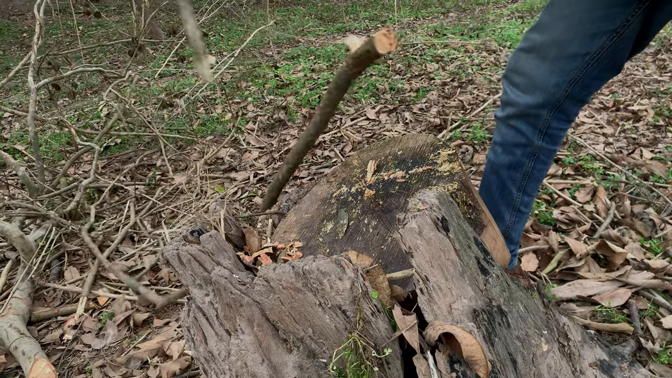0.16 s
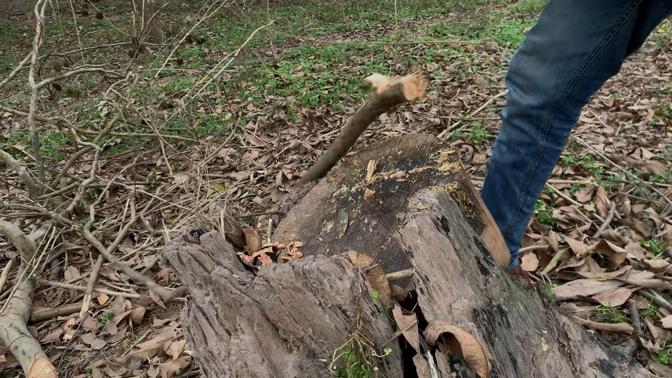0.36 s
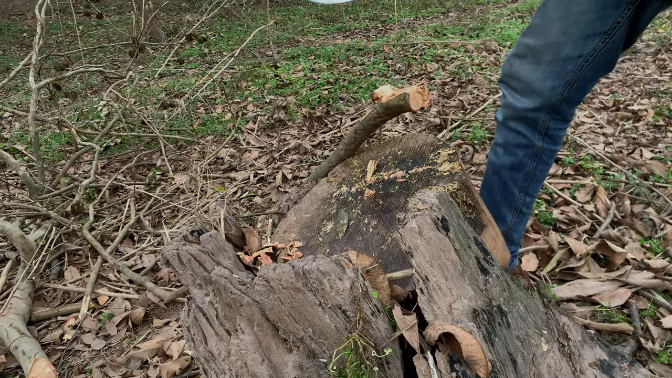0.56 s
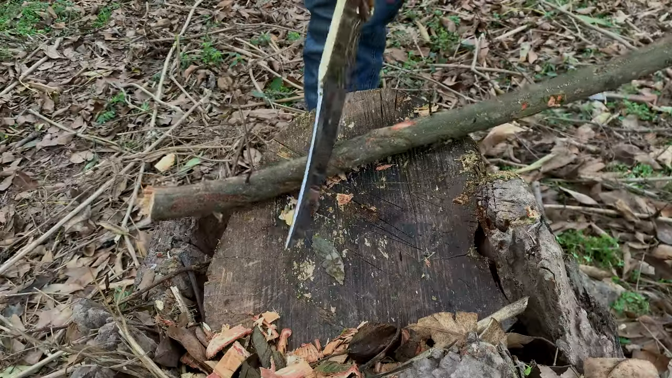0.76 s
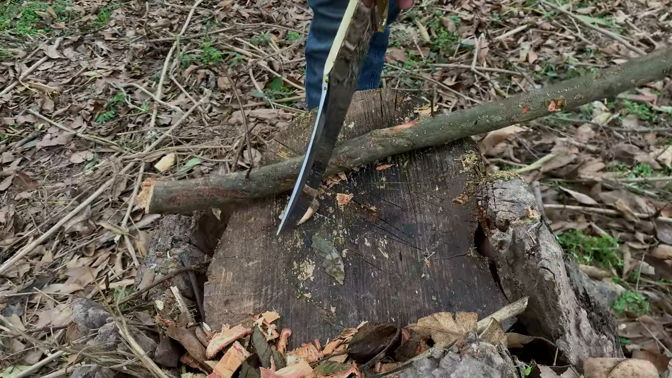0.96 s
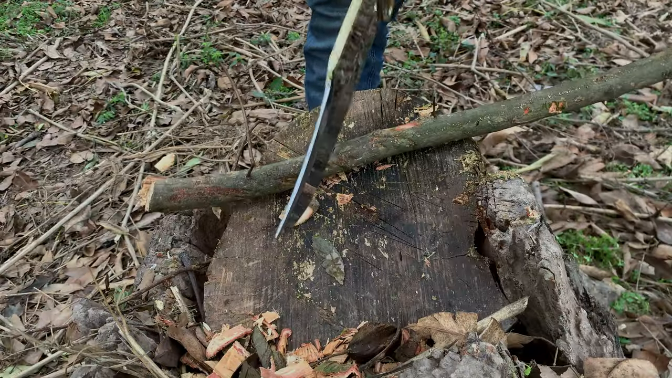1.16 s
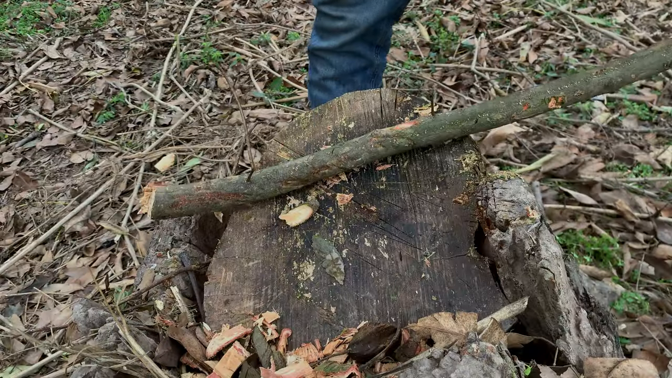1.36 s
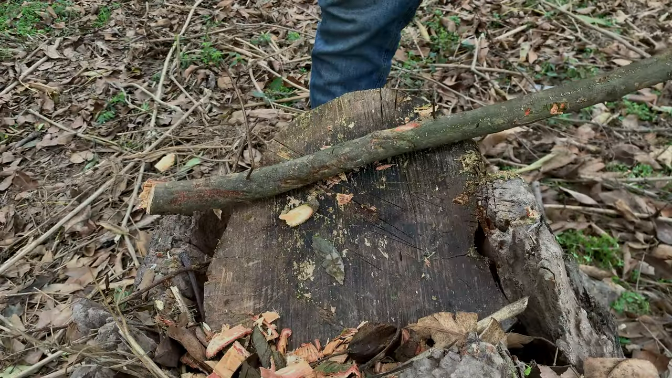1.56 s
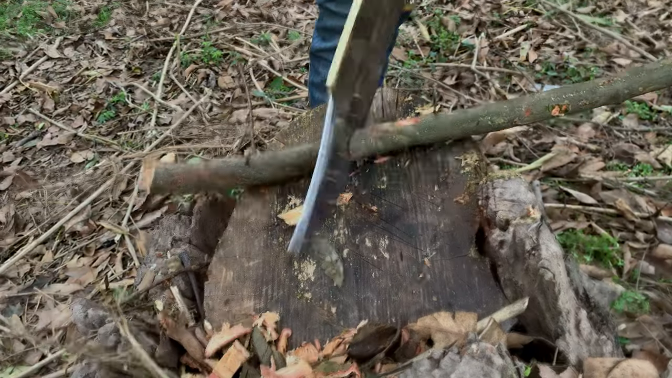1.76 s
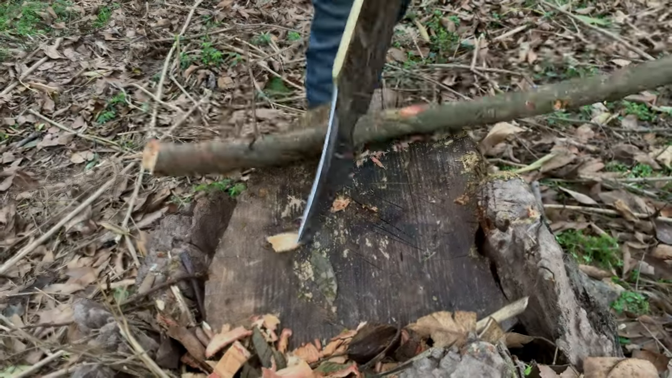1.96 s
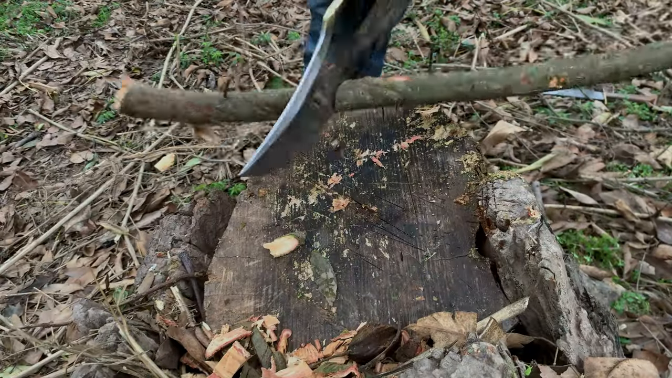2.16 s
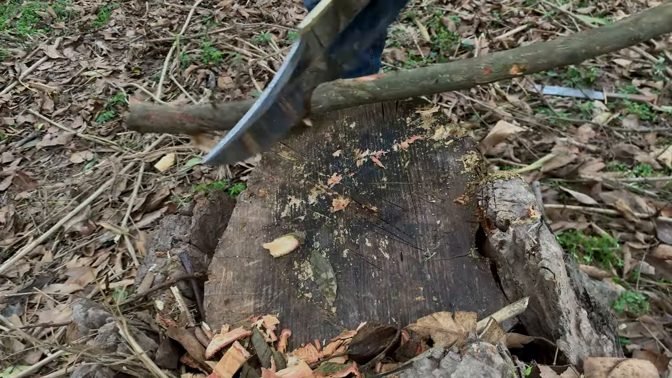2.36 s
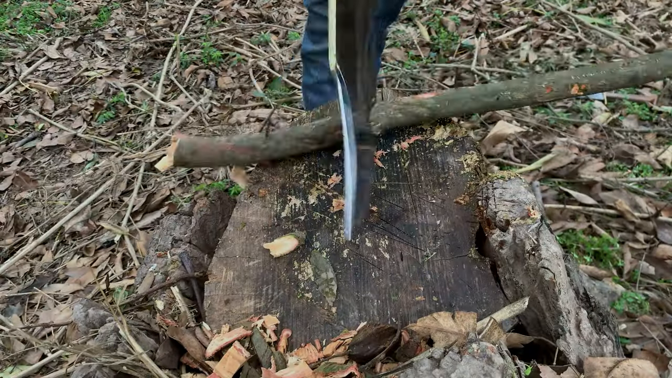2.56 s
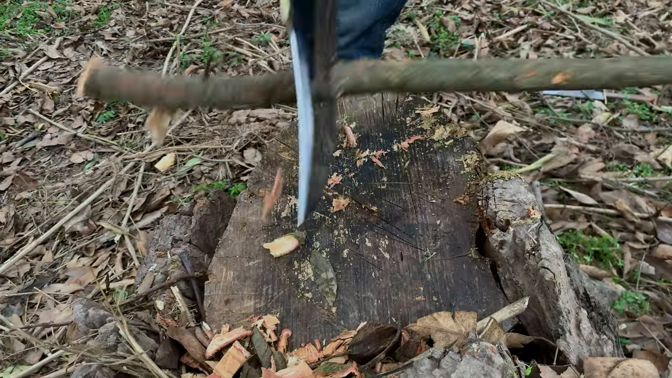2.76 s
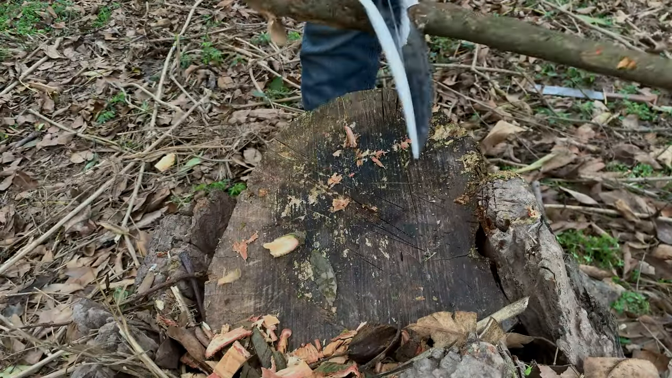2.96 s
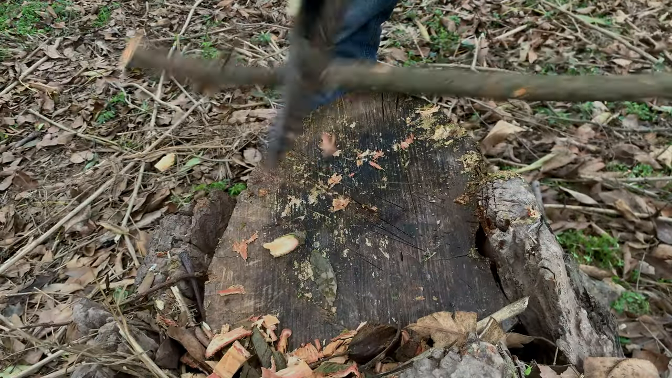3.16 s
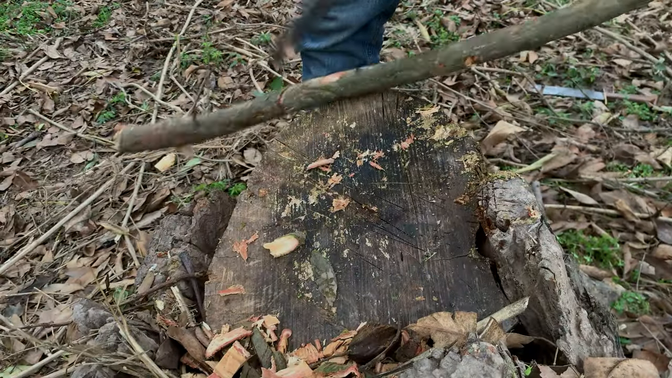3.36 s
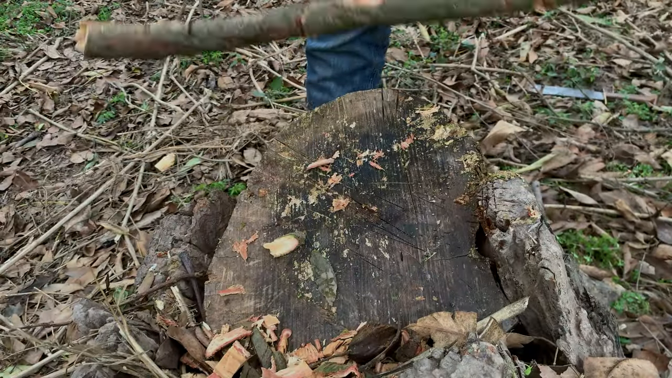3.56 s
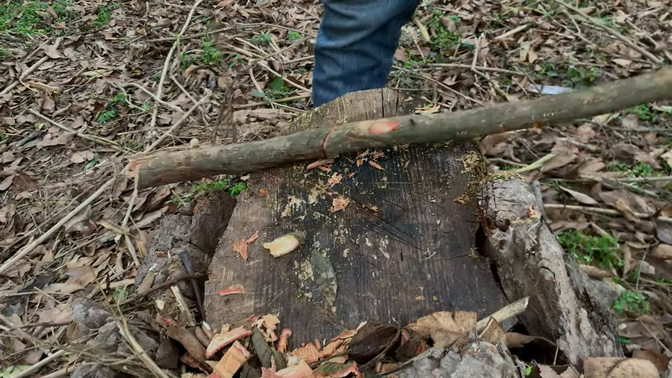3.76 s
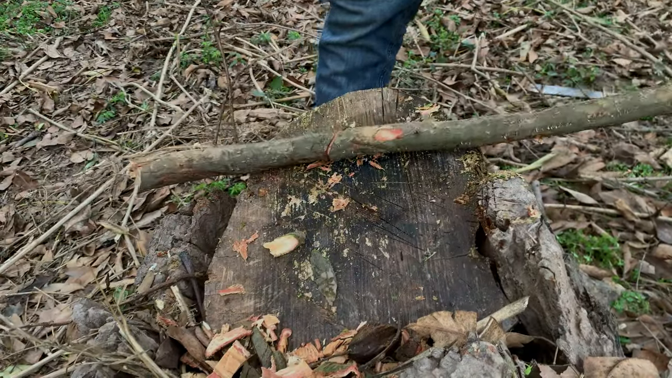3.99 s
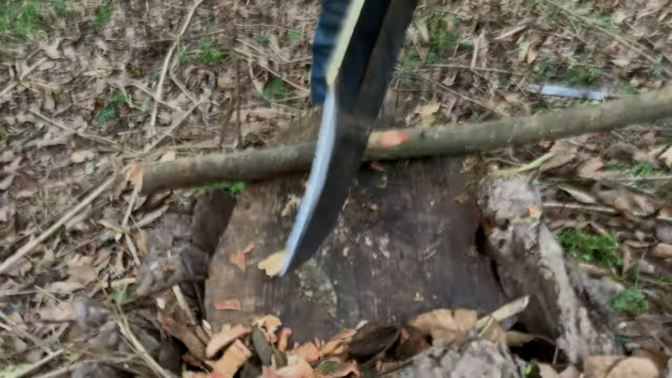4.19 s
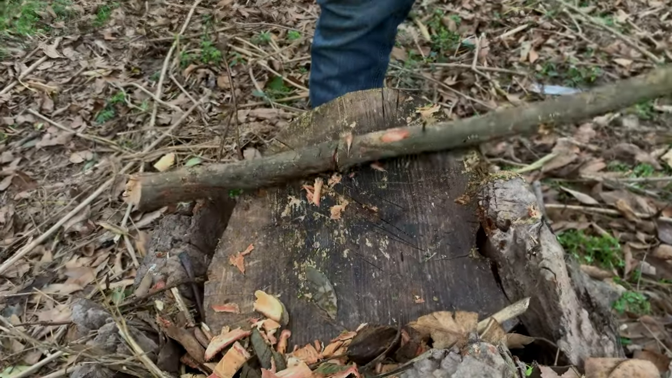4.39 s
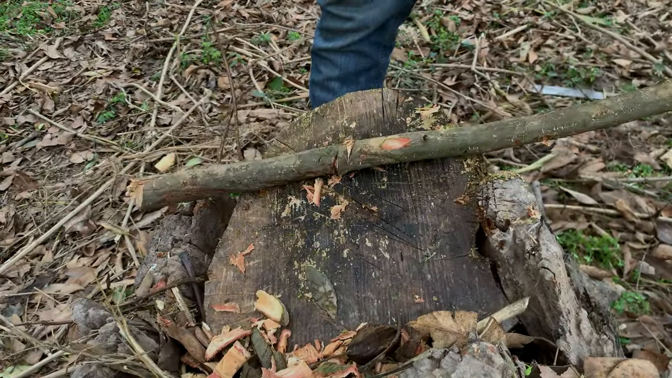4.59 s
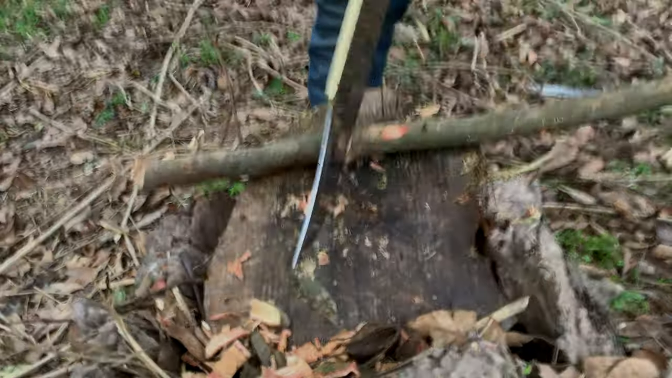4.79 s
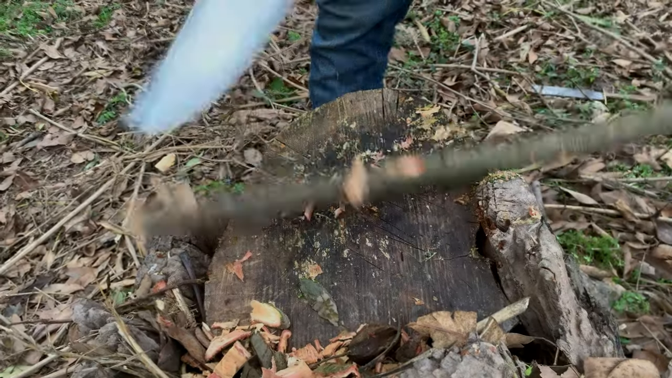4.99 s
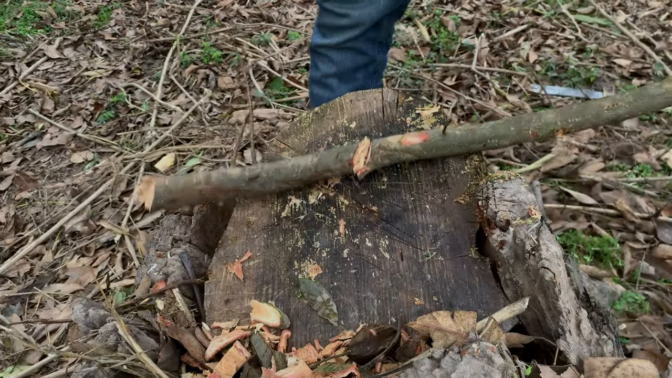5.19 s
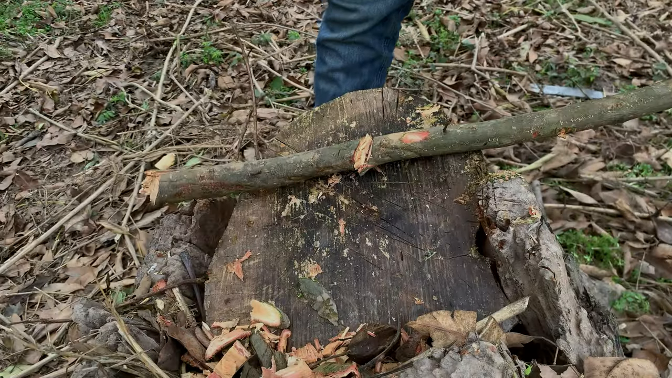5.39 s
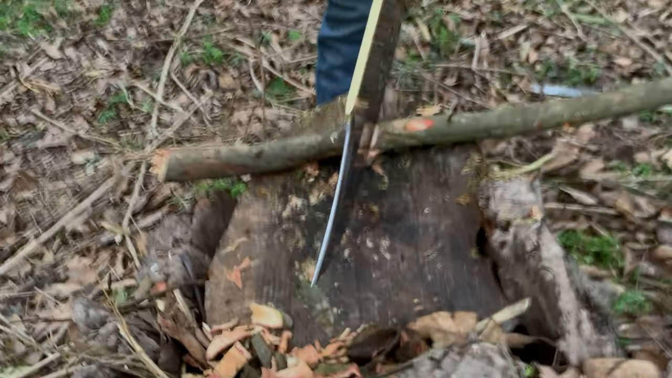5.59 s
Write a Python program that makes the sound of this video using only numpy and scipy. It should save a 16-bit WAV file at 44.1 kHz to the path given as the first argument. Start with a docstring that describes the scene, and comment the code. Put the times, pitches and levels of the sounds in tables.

```python
"""Knife chops on a tree stump

A large knife chops a green branch on a stump: four hard chops, with lighter knocks before and between.
A chop stacks noise bursts of breaking fibres, short decaying modes of wood and steel, and a falling thud.
Wobbling harmonics make one blade squeak; short noise bursts make the ticks of chips and twigs.
Shaped, clumpy noise and tiny pings make sleeves, leaves and bark rustle.
Behind lie far whistled birds, a low noise rumble, a faint drone and a scattered tail from the trees.
"""
import sys
import numpy as np
from scipy import signal
from scipy.fft import rfft, irfft, next_fast_len
from scipy.io import wavfile
from scipy.ndimage import map_coordinates

SR = 44100
rng = np.random.default_rng(int(sys.argv[2]) if len(sys.argv) > 2 else 0)


def inscribe(sig):
    """Save sig as 16-bit PCM at rate SR to the path in sys.argv[1].

    A 1-D sig is mono; a 2-D sig holds one channel per row.
    Samples are clipped to [-1, 1] before scaling.
    """
    pcm = np.round(np.clip(np.atleast_2d(sig).T, -1, 1) * 32767)
    wavfile.write(sys.argv[1], SR, pcm.astype(np.int16))


N = 248724
TIME = np.arange(N) / SR  # the whole scene [s]
SIZE = 16384  # samples in one short sound
T = np.arange(SIZE) / SR  # one short sound [s]
HZ = np.fft.rfftfreq(SIZE, 1 / SR)
LEAD = .01  # a short sound starts this long before its contact [s]


def amp(db):
    """Decibels to gain."""
    return 10 ** (np.asarray(db) / 20)


def unit(x):
    """Scale to rms 1."""
    return x / np.sqrt(np.mean(x ** 2) + 1e-20)


def burst(x):
    """Scale each channel to the energy of 10 ms at rms 1."""
    return x / np.sqrt(np.sum(x ** 2, axis=-1, keepdims=True) / (.01 * SR))


def along(points, hz):
    """Read a curve of (Hz, value) points on a log frequency axis."""
    f, v = np.transpose(points)
    return np.interp(np.log(hz + 1), np.log(f + 1), v)


def wobble(rate):
    """A smooth random curve with this many knots a second."""
    knots = rng.standard_normal(int(N * rate / SR) + 4)
    return map_coordinates(knots, [TIME * rate])


def filtered(x, response):
    """Filter x by a complex response of frequency."""
    n = x.shape[-1]
    padded = next_fast_len(n + 8192)
    spectrum = rfft(x, padded) * response(np.fft.rfftfreq(padded, 1 / SR))
    return irfft(spectrum, padded)[..., :n]


def coloured(x, spectrum):
    """Filter x by a curve of (Hz, dB) points."""
    return filtered(x, lambda hz: amp(along(spectrum, hz)))


def add(track, s, sound):
    """Mix in a short sound with its contact at s seconds; its far tail fades out."""
    start = max(round((s - LEAD) * SR), 0)
    fade = 1 - (T / T[-1]) ** 2
    track[..., start:start + SIZE] += (sound * fade)[..., :N - start]


def pair(width, size=N):
    """Stereo white noise: a common mid plus a share of side."""
    mid, side = rng.standard_normal((2, size))
    return np.array([mid + width * side, mid - width * side])


def fibres(spectrum, crest_s, rise_s, t60, grain_db, width):
    """Many small breaks or contacts: spiky stereo noise swells to a crest and dies."""
    t = T - LEAD - crest_s
    swell = np.exp(np.minimum(t, 0) / rise_s)
    decay = amp(-60 * np.maximum(t, 0) / t60)
    sizes = amp(grain_db * rng.standard_normal(SIZE))
    return burst(coloured(swell * decay * sizes * pair(width, size=SIZE), spectrum))


def ring(modes, late_s, rise_s, spread_db, detune):
    """Struck modes decay, with strengths and pitches that vary with the point of contact."""
    t = np.maximum(T - LEAD - late_s, 0)
    chance = rng.uniform(-1, 1, (len(modes), 3))
    tones = 0
    for (hz, db, t60), (size, shift, turn) in zip(modes, chance):
        level = amp(db + spread_db * size - 60 * t / t60)
        tones = tones + level * np.sin(2 * np.pi * (hz * (1 + detune * shift) * t + turn))
    return burst(tones * (1 - np.exp(-t / rise_s)))


# weight of the thud by frequency: (frequency [Hz], level [dB])
THUD_COLOUR = [(25, -24.5), (42, -13.5), (65, 8), (100, 4.5), (140, -4), (230, -4.5), (320, -19),
               (500, -33.5), (900, -53)]
# how late each part of the thud arrives: (frequency [Hz], delay [s])
THUD_DELAY = [(40, 0.06527), (70, .043), (100, 0.0164), (140, 0.0217), (200, 0.0157), (300, .006), (500, 0),
              (1200, 0.0022)]


def push(rebound_s, rebound_db):
    """A push on the stump and its opposite rebound; low notes come late, so the thud falls in pitch."""
    delay_phase = 2 * np.pi * np.cumsum(along(THUD_DELAY, HZ)) * SR / SIZE
    lead_phase = 2 * np.pi * HZ * LEAD
    contacts = 1 - amp(rebound_db) * np.exp(-2j * np.pi * HZ * rebound_s)
    return burst(irfft(amp(along(THUD_COLOUR, HZ)) * contacts * np.exp(-1j * (delay_phase + lead_phase))))


# hard chops: (time [s], thud [dB], knock [dB], clack [dB], ring [dB], ring pitch [ratio], crack [dB],
#   snap [dB], rebound delay [s], rebound beside the push [dB], rattle [dB])
CHOPS = [(1.7595, -4.5, -19, -19, -20, .83, -26.5, -27.5, .0095, -5, -57.5),
         (4.1, -3.5, -18.5, -25.5, -21, .99, -25.5, -22, .0102, 1, -44.5),
         (4.727, -3, -16.5, -21, -24.5, 1.16, -26.5, -20.5, 0.01039, -0.5, -53),
         (5.536, -5, -16, -29.5, -19, .99, -31.5, -28.5, .011, 1, -55)]
# the stump booms: (frequency [Hz], level [dB], t60 [s])
STUMP_BOOM = [(65.3, 1.5, 0.78), (119.4, -9, 0.41), (151.8, 4, .3), (185.5, -13, 0.37), (251, -7.5, 0.2)]
# the stump's top knocks: (frequency [Hz], level [dB], t60 [s])
STUMP_TOP = [(338, -5.5, 0.052), (374.8, -3, .055), (454, -1.5, .05), (536, 3.5, 0.024), (635, -8, 0.038),
             (817, -4.5, 0.033)]
# the branch rings: (frequency [Hz], level [dB], t60 [s])
BRANCH = [(1140, -17, 0.04), (1215, -9.5, .022), (1690, -2.5, 0.023), (2020, -21.5, 0.035),
          (2290, -15, 0.019), (2615, -15, 0.038)]
# steel, damped by the cut: (frequency [Hz], level [dB], t60 [s])
BLADE = [(3770, -1, 0.035), (4310, 1.5, 0.041), (4470, -6.5, 0.048), (5280, -5, 0.054), (5170, -6.5, 0.044),
         (6680, 1.5, 0.036), (6740, -3, 0.021)]
# hard wood on wood: (frequency [Hz], level [dB])
CLACK = [(300, -22), (550, -0.5), (820, 2), (1000, -5.5), (1300, -14), (1800, -19.5), (4000, -42.5)]
# wood parting: (frequency [Hz], level [dB])
SPLIT = [(500, -4), (1000, -8.5), (2000, -1.5), (3000, -12), (5000, -22)]
# cracking fibres and bark: (frequency [Hz], level [dB])
CRACK = [(1500, -37.5), (3000, -2.5), (4500, -8.5), (6800, -7.5), (9000, -18.5), (16000, -33.5)]
# the sharpest snap on top: (frequency [Hz], level [dB])
SNAP = [(4000, -27.5), (7500, -7.5), (9500, 0), (11000, -1.5), (13000, -8.5), (16000, -20)]


def chops():
    """The blade splits fibres and rings, drives the branch into the stump, and crumbs scatter."""
    out = np.zeros((2, N))
    for (s, thud_db, knock_db, clack_db, ring_db, pitch, crack_db,
         snap_db, rebound_s, rebound_db, rattle_db) in CHOPS:
        # the stump is pushed, booms and knocks
        thud = amp(thud_db) * push(rebound_s, rebound_db)
        hollow = amp(thud_db - 14.0) * ring(
            STUMP_BOOM, late_s=0.0249, rise_s=0.0039, spread_db=5.5, detune=.004)
        knock = amp(knock_db) * ring(
            STUMP_TOP, late_s=0.0013, rise_s=0.0011, spread_db=1.5, detune=0.055)
        clack = amp(clack_db) * fibres(
            CLACK, crest_s=0.0015, rise_s=0.00086, t60=0.019, grain_db=2.0, width=0.17)
        # the branch bounces, slaps the stump again and rattles
        slap = amp(knock_db - 14.5) * ring(
            STUMP_TOP[:3], late_s=.021, rise_s=0.0034, spread_db=2.0, detune=0.078)
        rattle = amp(rattle_db) * fibres(
            CLACK, crest_s=.059, rise_s=.001, t60=0.044, grain_db=4.5, width=0.28)
        # the branch rings higher or lower with the place where it is struck and held
        held_branch = [(hz * pitch, db, t60) for hz, db, t60 in BRANCH]
        wood = amp(ring_db) * ring(
            held_branch, late_s=0, rise_s=0.00072, spread_db=3.0, detune=0.018)
        steel = amp(crack_db - 7.0) * ring(
            BLADE, late_s=0, rise_s=.0008, spread_db=4.5, detune=0.0025)
        # the fibres give way
        split = amp(ring_db) * fibres(
            SPLIT, crest_s=0.0017, rise_s=0.002, t60=0.023, grain_db=4, width=0.37)
        crack = amp(crack_db) * fibres(
            CRACK, crest_s=0.0022, rise_s=.0018, t60=0.029, grain_db=6.5, width=.6)
        snap = amp(snap_db) * fibres(
            SNAP, crest_s=0.0013, rise_s=0.0012, t60=0.0076, grain_db=9.5, width=0.062)
        # debris follows, later and longer
        crumbs = amp(crack_db - 25) * fibres(
            CRACK, crest_s=0.022, rise_s=.008, t60=0.2, grain_db=11, width=0.65)
        dust = amp(snap_db - 31.5) * fibres(
            SNAP, crest_s=0.042, rise_s=.008, t60=0.46, grain_db=11, width=.3)
        stump = thud + hollow + knock + clack + slap + rattle
        add(out, s, stump + wood + steel + split + crack + snap + crumbs + dust)
    return out


# the branch drops or is set down on the stump:
#   (time [s], thud [dB], hollow [dB], knock [dB], ring [dB])
KNOCKS = [(.04, -29.5, -43.5, -45.5, -54), (.097, -32, -43, -48, -78), (.317, -35, -42, -55, -71),
          (.784, -29.5, -25.5, -49, -70), (1.904, -37.5, -39, -58.5, -63.5), (2.583, -28, -22.5, -37, -37),
          (3.071, -32, -35.5, -64.5, -73), (3.112, -32.5, -41.5, -48, -52), (3.197, -26, -37.5, -52.5, -75),
          (3.274, -28, -66, -46, -80), (3.682, -18.5, -25.5, -27, -36), (5.03, -23.5, -29.5, -39, -60)]
BARK_DB, BARK_GROWS = -32.5, 0.42  # bark crack at a 0 dB ring [dB]; its growth [dB per dB of ring]


def knocks():
    """The branch meets the stump without being cut; the harder it rings, the more its bark cracks."""
    out = np.zeros((2, N))
    for s, thud_db, hollow_db, knock_db, ring_db in KNOCKS:
        rebound_s = 0.01498 * amp(2.5 * rng.normal())
        thud = amp(thud_db) * push(rebound_s, rebound_db=-4.5)
        hollow = amp(hollow_db) * ring(
            STUMP_BOOM, late_s=0.019, rise_s=0.0057, spread_db=3.5, detune=.004)
        knock = amp(knock_db) * ring(
            STUMP_TOP, late_s=.001, rise_s=0.0027, spread_db=1.0, detune=0.054)
        wood = amp(ring_db) * ring(
            BRANCH, late_s=0, rise_s=0.0012, spread_db=3.5, detune=0.068)
        bark = amp(BARK_DB + BARK_GROWS * ring_db) * fibres(
            CRACK, crest_s=0.00066, rise_s=0.0016, t60=0.044, grain_db=4.5, width=0.25)
        clack = amp(ring_db - 0.5) * fibres(
            CLACK, crest_s=0.0011, rise_s=.001, t60=0.042, grain_db=4, width=.25)
        add(out, s, thud + hollow + knock + wood + clack + bark)
    return out


# the blade squeaks in the cut: (time [s], pitch [Hz], level [dB], width as a bell curve's sigma [s])
SQUEAKS = [(2.5722, 1200, -25, 0.0025), (2.577, 1141, -33.5, 0.0031)]
# harmonics of the squeak: (multiple of the pitch, level [dB])
SQUEAK_TONE = [(1, -12.5), (2, -1), (3, -5.5), (4, -23), (6, -27)]


def squeaks():
    """Steel sticks and slips in the wet cut as it comes free: unsteady harmonics in a brief swell."""
    out = np.zeros(N)
    for s, hz, db, width_s in SQUEAKS:
        pitch = hz * (1 + 0.013 * wobble(320)[:SIZE])
        phase = 2 * np.pi * np.cumsum(pitch) / SR
        tone = sum(amp(level) * np.sin(k * phase) for k, level in SQUEAK_TONE)
        swell = np.exp(-.5 * ((T - LEAD) / width_s) ** 2)
        add(out, s, amp(db) * tone * swell)
    return out


# the loudest chips and twigs: (time [s], level [dB], brightness [dB])
TICKS = [(.1386, -57, 2), (.4623, -57, -9.5), (1.6062, -53.5, 0), (1.8228, -52.5, 2), (1.8647, -56, -3.5),
         (2.2672, -42, 8.5), (2.3236, -62, 14.5), (2.7866, -57, -0.5), (2.803, -54, 2), (3.0535, -53, 1),
         (3.6252, -51, -4.5), (3.6501, -55.5, -2.5), (4.4114, -63, -8.5), (4.7631, -45, 9.5),
         (4.809, -50, -1), (4.9661, -58.5, 0), (5.0384, -60, 10), (5.1128, -55.5, 1.5), (5.1961, -56, -3.5),
         (5.4345, -58.5, -6)]
TICK_WOOD_DB, TICK_SNAP_DB = -6, -8.5  # dull and sharp parts beside the crack, at brightness 0
STRAY_PER_S, STRAY_DB, STRAY_SPREAD_DB = 6.9, -75, 8.5  # random ticks: rate, mid level, spread either way


def ticks():
    """Chips land and twigs snap in tiny bursts; a bright one has less wood and more snap."""
    out = np.zeros((2, N))
    chance = rng.random((round(STRAY_PER_S * N / SR), 3))
    strays = [(when * N / SR, STRAY_DB + STRAY_SPREAD_DB * (2 * size - 1), 6 * (2 * tone - 1))
              for when, size, tone in chance]
    for s, db, bright_db in list(TICKS) + strays:
        parts = (SPLIT, TICK_WOOD_DB - bright_db), (CRACK, 0), (SNAP, TICK_SNAP_DB + bright_db)
        for spectrum, part_db in parts:
            tick = fibres(spectrum, crest_s=0.001, rise_s=0.00039, t60=0.011, grain_db=3.0, width=.4)
            add(out, s, amp(db + part_db) * tick)
    return out


STROKE_SHAPE = 0.87  # power of the arch


def arch(start, length):
    """A movement swells and fades along a parabola raised to a power."""
    u = np.clip((TIME - start) / length, 0, 1)
    return (4 * u * (1 - u)) ** STROKE_SHAPE


SETTLE_RISE_S, SETTLE_DB_PER_S = 0.055, 67  # time constant of the stir; rate of the fade


def settling(s):
    """Leaves shaken by a chop stir and come to rest."""
    t = np.maximum(TIME - s, 0)
    return (1 - np.exp(-t / SETTLE_RISE_S)) * amp(-SETTLE_DB_PER_S * t)


BREAKS_PER_S, BREAK_SPREAD_DB = 150, 3
STALK_HZ, STALK_OCTAVES = 3600, .7  # middle pitch and its scatter
STALK_PAN_DB = 5  # scatter of the pan: one side up, the other down by this
STALK_CYCLES = 7  # cycles until a ping is 60 dB down


def stalks():
    """Dry stalks break one by one, each a ping with its own size, pitch and place."""
    draws = rng.standard_normal((round(BREAKS_PER_S * N / SR), 3))
    starts = rng.integers(0, N, len(draws))
    size, tone, side = draws.T[:, :, None]
    hz = np.clip(STALK_HZ * 2 ** (STALK_OCTAVES * tone), 400, 14000)
    t = T[:256]
    level = amp(BREAK_SPREAD_DB * np.clip(size, -2, 2) - 60 * t * hz / STALK_CYCLES)
    pings = level * np.sin(2 * np.pi * hz * t)
    where = (starts[:, None] + np.arange(len(t))).ravel()
    channels = []
    for sign in (1, -1):
        panned = pings * amp(sign * STALK_PAN_DB * side)
        channels.append(np.bincount(where, panned.ravel(), N)[:N])
    return unit(np.array(channels))


def friction(slip_db, clump_db):
    """Friction comes in clumps of tiny slips: wide noise of uneven level."""
    return pair(width=1.0) * amp(slip_db * wobble(1500) + clump_db * wobble(90))


def strokes(rows):
    """The summed swells of (start [s], length [s], level [dB]) rows."""
    return sum(amp(db) * arch(s, length) for s, length, db in rows)


# the arm and the branch move: (start [s], length [s], leaf crunch [dB], sleeve swish [dB])
MOVES = [(.01, .23, -55.5, -62), (0.206, 0.31, -55.5, -70.5), (0.882, 0.14, -80, -71.5),
         (1.095, .24, -67, -76.5), (1.54, 0.3, -57, -69), (2.505, 0.19, -63.5, -63),
         (2.715, 0.32, -59.5, -61), (2.997, 0.48, -60.5, -61.5), (3.513, 0.32, -59.5, -66),
         (4.267, 0.18, -74.5, -76), (4.915, 0.38, -64.5, -66)]
# leaf litter is pressed down: (start [s], length [s], level [dB])
PRESSES = [(.035, .16, -43), (.15, .37, -51.5)]
# bark slides over the stump: (start [s], length [s], level [dB])
DRAGS = [(0.262, 0.073, -70), (1.596, 0.09, -48.5), (2.797, 0.22, -53), (3.163, 0.12, -46.5)]
# dry leaves: (frequency [Hz], level [dB])
CRUNCH = [(300, -13.5), (900, 9), (2000, 4), (4000, 3.5), (7000, -10.5), (10000, -12.5), (16000, -41.5)]
# sleeves: (frequency [Hz], level [dB])
SWISH = [(3000, -31), (7000, 7), (9500, -4.5), (13000, 1.5), (16000, -16.5)]
# pressed litter: (frequency [Hz], level [dB])
LITTER = [(60, 4), (200, 9), (500, 1), (1000, -5.5), (2500, -20), (8000, -50)]
# sliding bark: (frequency [Hz], level [dB])
BARK = [(400, 5), (1500, -12.5), (3000, 0), (5500, -2.5), (9000, -9.5), (13000, -7.5), (16000, -22)]
SETTLE_CRUNCH_DB, SETTLE_SWISH_DB = -52, -62.5  # stirred by each chop
STILL_CRUNCH_DB, STILL_SWISH_DB = -68.5, -81  # floor between movements
JERK_DB, JERK_PER_S = 2, 28  # movements are uneven


def rustle():
    """Sleeves swish, dry leaves crunch and bark drags: coloured friction noise follows the movements."""
    jerk = amp(JERK_DB * wobble(JERK_PER_S))
    shaken = sum(settling(s) for s, *_ in CHOPS)
    leaves = amp(SETTLE_CRUNCH_DB) * shaken + strokes([(s, length, db) for s, length, db, _ in MOVES])
    sleeves = amp(SETTLE_SWISH_DB) * shaken + strokes([(s, length, db) for s, length, _, db in MOVES])
    leaves = np.hypot(amp(STILL_CRUNCH_DB), jerk * leaves)
    sleeves = np.hypot(amp(STILL_SWISH_DB), jerk * sleeves)
    press = jerk * strokes(PRESSES)
    slide = jerk * strokes(DRAGS)
    crunch = leaves * unit(coloured(friction(slip_db=1.0, clump_db=1.5), CRUNCH))
    swish = sleeves * unit(coloured(friction(slip_db=3.0, clump_db=3.0), SWISH))
    litter = press * unit(coloured(friction(slip_db=4.0, clump_db=3), LITTER))
    drag = slide * unit(coloured(friction(slip_db=2.0, clump_db=2.5), BARK))
    # stalks crackle along with leaves, litter and bark
    crackle = (amp(-8) * leaves + amp(-21) * press + amp(-17) * slide) * stalks()
    return crunch + swish + litter + drag + crackle


# far birds, one row a phrase, its length rounded to whole notes:
#   (start [s], length [s], note rate [1/s], highest pitch of a note [Hz], level [dB])
BIRD = [(1.133, .11, 8.1, 4380, -73), (1.296, .36, 1.8, 4000, -71.5), (1.958, .3, 10, 4105, -70),
        (2.005, .3, 10, 2340, -68)]
SLUR, NOTE_PEAK = 0.12, .25  # curvature of a note's pitch arch; where in the note it is highest
BLUR_HZ, BLUR_PER_S = 44.1, 160  # scattering smears the pitch


def bird():
    """Phrases of thin, arching whistles from far off, blurred by the trees."""
    out = np.zeros(N)
    for s, length, rate, hz, db in BIRD:
        u = np.clip((TIME - s) * rate, 0, round(length * rate)) % 1  # place within the note
        slurred = hz * (1 - SLUR * (u - NOTE_PEAK) ** 2)
        pitch = slurred + BLUR_HZ * wobble(BLUR_PER_S)
        out += amp(db) * np.sin(np.pi * u) * np.sin(2 * np.pi * np.cumsum(pitch) / SR)
    flutter = np.array([wobble(210), wobble(140)])  # each side flickers on its own
    return out * (1 + .6 * flutter)


# low outdoor rumble: (frequency [Hz], level [dB])
AIR = [(12, -50.5), (20, -22.5), (34, -6.5), (59, 5.5), (92, -8), (153, -17.5), (173, -27), (232, -25),
       (346, -33), (663, -33.5), (721, -39.5), (784, -36), (1320, -51), (2380, -43.5), (3000, -49.5),
       (3900, -87), (6600, -120)]


def outdoors():
    """A low noise rumble, a faint far drone of narrow noise, and the birds."""
    rumble = amp(-44.0 + 1.4 * wobble(14)) * unit(coloured(pair(width=0.46), AIR))
    narrow = filtered(pair(width=1.0), lambda hz: 1 / (1 + ((hz - 738) / 25) ** 2))
    drone = amp(-67.5 + 2 * wobble(1.2)) * unit(narrow)
    return rumble + drone + bird()


# decay of the scattered tail: (frequency [Hz], t60 [s])
WOODS_DECAY = [(60, 0.91), (200, 0.26), (600, 0.092), (2000, 0.16), (5000, 0.13), (12000, 0.15)]
# colour of the scattered tail: (frequency [Hz], level [dB])
WOODS_COLOUR = [(40, -14), (150, -11), (400, -9), (1500, -22), (4500, -14), (8000, -18), (15000, -37.5)]


def woods(x):
    """Trees and ground scatter a faint tail: noise whose decay depends on frequency."""
    hz, t, z = signal.stft(rng.standard_normal((2, SR // 2)), SR, nperseg=256)
    t60 = along(WOODS_DECAY, hz)[:, None]
    decaying = z * amp(-60 * t / t60) / np.sqrt(t60)
    tail = signal.istft(decaying, SR, nperseg=256)[1]
    wet = signal.fftconvolve(x, tail / np.linalg.norm(tail[0]), axes=1)[:, :N]
    return coloured(wet, WOODS_COLOUR)


# phase between the two ports: (frequency [Hz], lead of the left [rad])
PORT_PHASE = [(30, -.2), (65, -.65), (160, -.7), (300, -.5), (450, .15), (650, .2), (1000, -1.2),
              (1350, -1), (1650, -.1), (2300, -1), (3300, -2.3), (4500, -1.5), (8000, -1.6), (10000, -.7),
              (14000, -.1)]
# level between the two ports: (frequency [Hz], left minus right [dB])
PORT_TILT = [(60, 2), (240, -0.6), (400, 2.5), (650, 7.5), (1300, -1), (2400, 4), (4500, 2), (8000, 1.5),
             (14000, 0.5)]


def ports(x):
    """Two microphone ports hear the stump at different phases and levels, half the gap on each side."""
    half = np.array([[.5], [-.5]])
    return filtered(x, lambda hz: amp(half * along(PORT_TILT, hz))
                    * np.exp(1j * half * along(PORT_PHASE, hz)))


def scene():
    """The work on the stump, close by, in a quiet wood."""
    work = chops() + knocks() + squeaks() + ticks()
    return ports(work) + woods(work) + rustle() + outdoors()


TOP_HZ = 16200  # band limit


def record(dry):
    """The recorder rounds off the highest peaks and cuts steeply above its band limit."""
    held = dry / (1 + np.abs(dry / .92) ** 6) ** (1 / 6)
    return filtered(held, lambda hz: 1 / (1 + (hz / TOP_HZ) ** 120))


dry = scene()
out = record(dry)
inscribe(out)
```